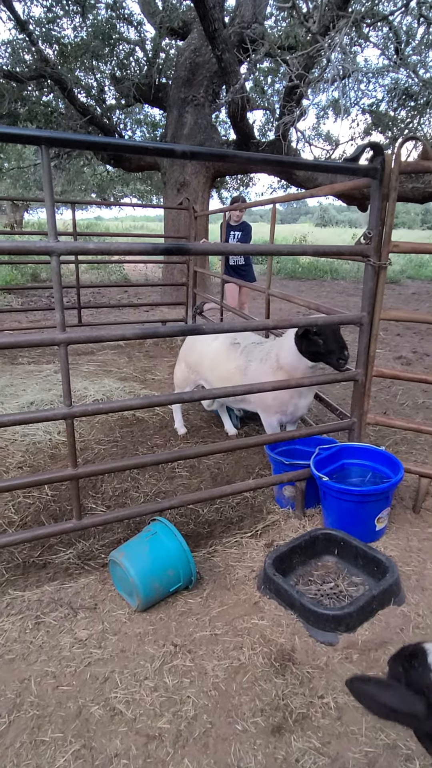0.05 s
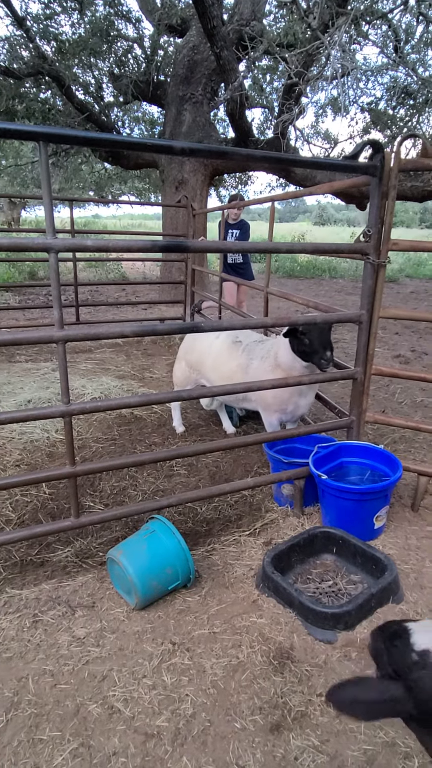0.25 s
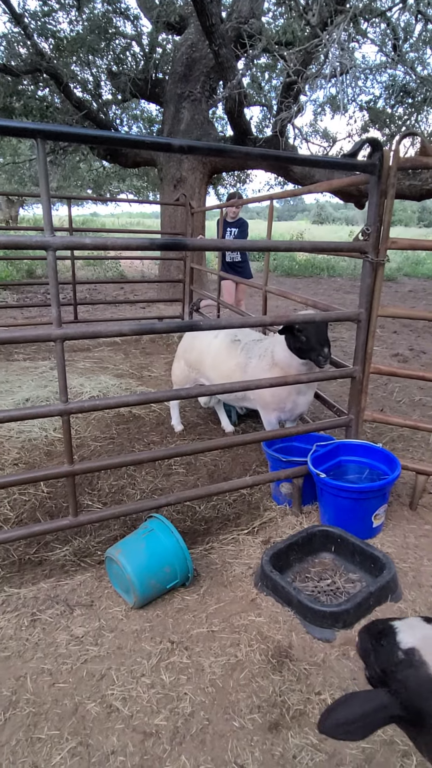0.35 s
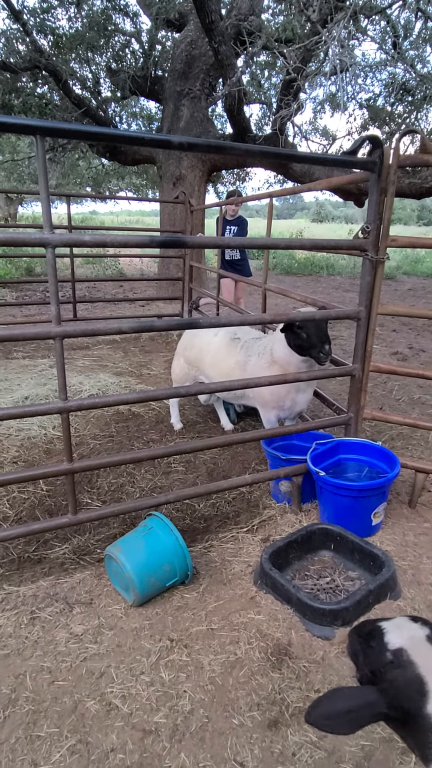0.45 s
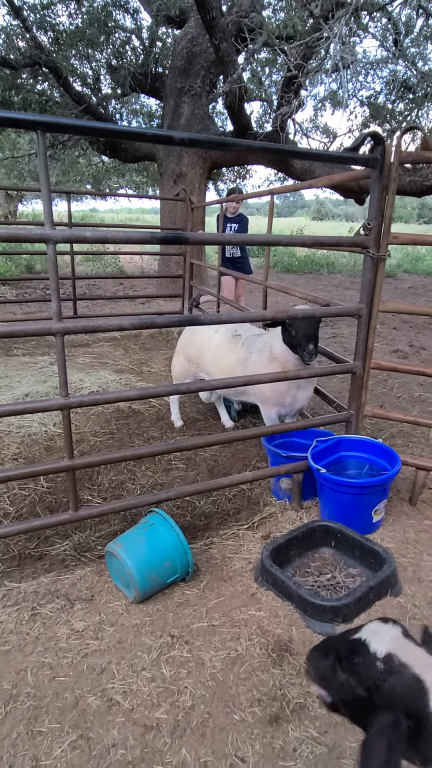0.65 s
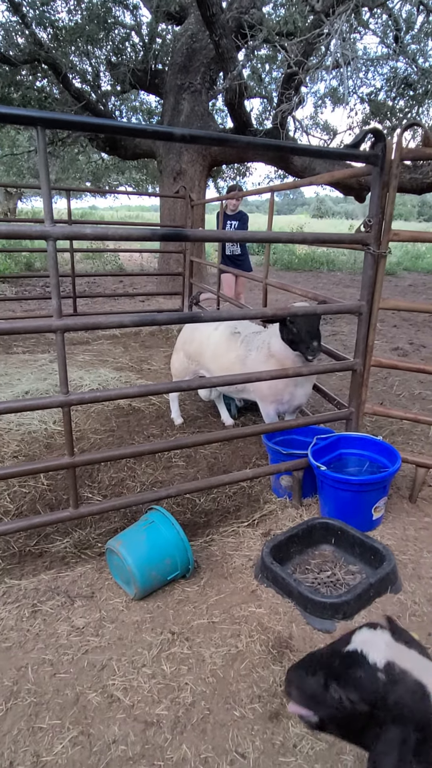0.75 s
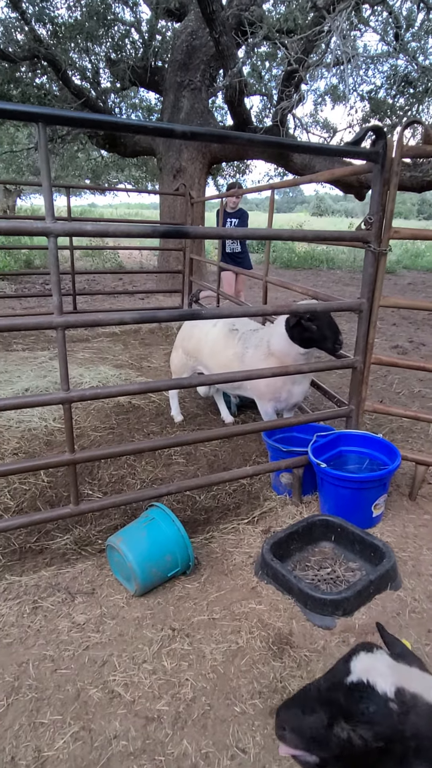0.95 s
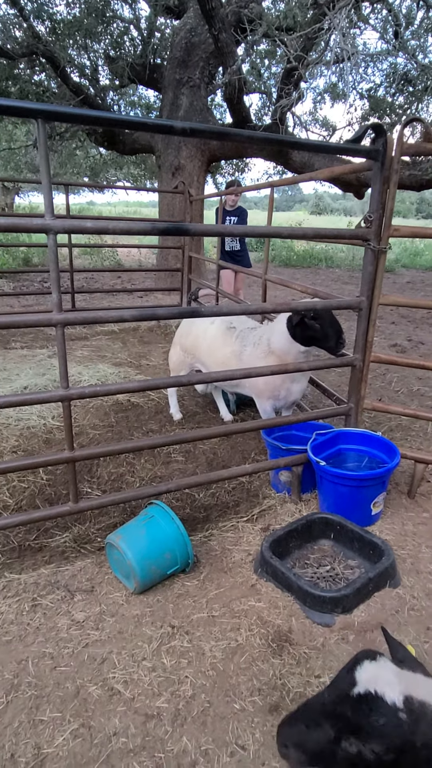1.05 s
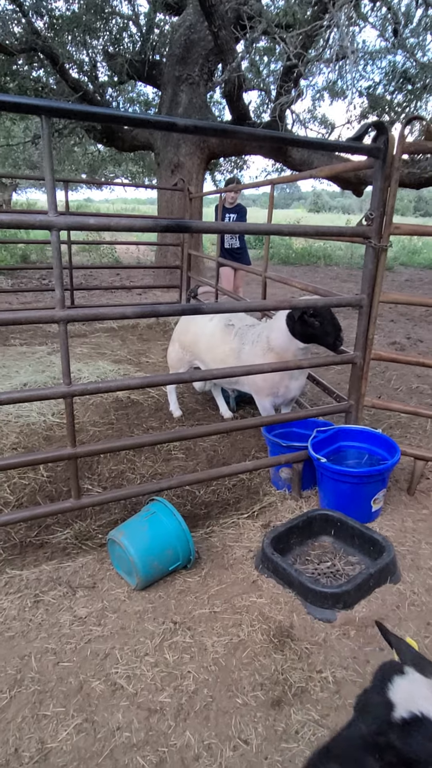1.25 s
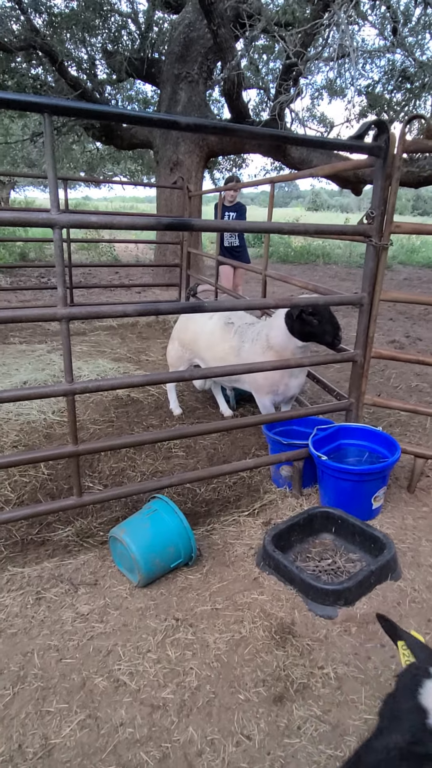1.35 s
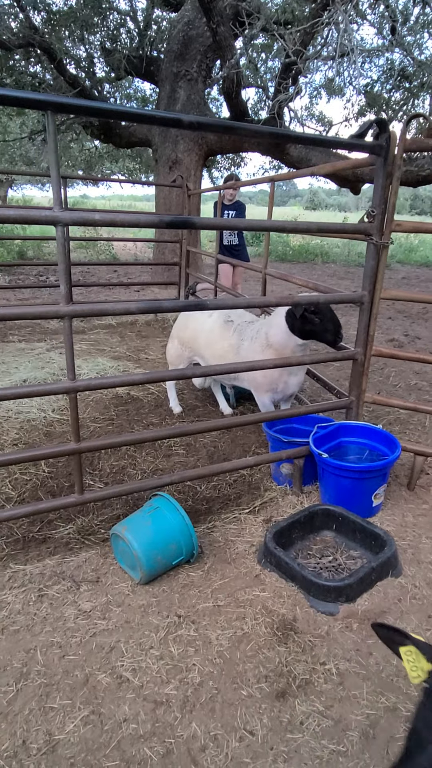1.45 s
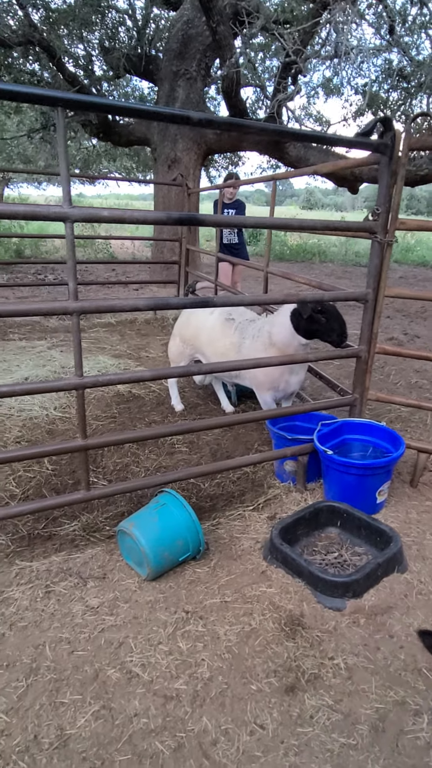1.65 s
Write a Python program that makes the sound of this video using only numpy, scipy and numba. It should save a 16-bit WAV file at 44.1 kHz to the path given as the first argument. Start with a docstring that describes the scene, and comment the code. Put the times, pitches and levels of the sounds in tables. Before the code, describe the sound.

A sheep gives one hoarse, quavering bleat in an outdoor pen.

```python
"""Ram bleating in an open pen

A phone stands a few metres from a ram, which draws air and gives one hoarse, quavering bleat.
Slack throat tissue flaps, the vocal folds buzz in and out of pitch and air rasps through the mouth.
Close to the microphone straw ticks and, after the bleat, something creaks, over a faint hum and hiss."""
import sys
import numpy as np
from scipy import signal
from scipy.fft import rfft, irfft
from scipy.io import wavfile
from scipy.ndimage import uniform_filter1d
from numba import njit

SR = 44100
rng = np.random.default_rng(int(sys.argv[2]) if len(sys.argv) > 2 else 0)


def unload_wav(signal):
    """Save mono or channel-first audio to the path in sys.argv[1] as 16-bit WAV at rate SR, clipped to [-1, 1]."""
    wavfile.write(
        sys.argv[1],
        SR,
        np.round(np.clip(np.atleast_2d(signal).T, -1, 1) * 32767).astype(np.int16),
    )


N = 74970

# the bleat's loudness, a quaver that deepens into separate throbs: time_s, level_db
EFFORT = [(0.17, -51.5), (0.208, -28.5), (0.216, -18), (0.24, -22.5), (0.248, -13.5), (0.288, -23),
          (0.296, -13.5), (0.318, -10.5), (0.348, -15.5), (0.358, -13), (0.378, -16), (0.406, -11.5),
          (0.416, -26), (0.424, -9), (0.456, -16.5), (0.462, -12), (0.508, -17), (0.522, -10), (0.574, -18),
          (0.596, -10.5), (0.652, -21), (0.67, -11), (0.68, -14), (0.71, -13), (0.724, -23.5),
          (0.764, -12.5), (0.796, -14), (0.804, -26.5), (0.822, -29), (0.834, -16), (0.88, -16.5),
          (0.908, -36.5), (0.926, -14.5), (0.968, -13), (0.99, -37), (1.01, -13), (1.06, -68.5)]
# gain on each band of the voice: time_s, middle_db, treble_db, low_db, hiss_db
BAND_GAINS = [(.19, 9, 7.5, 15.5, 1), (.225, -3, 8.5, -4.5, 9), (.255, 10, 7.5, -3.5, 3),
              (.288, 2.5, 9, 2.5, 3.5), (.315, 0, -1, -8, -2.5), (.345, 2, 2.5, 0.5, -1),
              (.40, 3.5, -2, 1, 2.5), (.45, 1, -4, -1, -3.5), (.525, 0, -4, -1, 1),
              (.59, 5, -2.5, -1, -3.5), (.70, 0.5, -4.5, 0, 1.5), (.78, 2.5, -7.5, -3, -3),
              (.85, 2.5, -1.5, 3, -0.5), (.94, 2.5, -9, 1, -2), (1.005, 2.5, 5.5, -3.5, -3.5),
              (1.035, 1, 7, 17, 8)]
# resonances of the moving mouth: time_s, first_hz, second_hz
MOUTH = [(.2, 803, 1960), (.25, 886, 1810), (.36, 856, 1780), (.45, 903, 2000), (.55, 888, 2065),
         (.70, 923, 2110), (.79, 857.2, 2126), (.95, 920, 2017), (1.04, 745, 1790)]
# vocal folds: time_s, pitch_hz, buzz_share (0-1)
FOLDS = [(.2, 205.3, 0.22), (.33, 211.9, 0.06), (.44, 218.7, 0.08), (.53, 218.9, 0.08), (.64, 221.8, 0.34),
         (.675, 234.4, 0.8), (.72, 231.3, 0.82), (.78, 228, 0.61), (.83, 219.3, 0.2), (.95, 206.5, .5),
         (1.04, 193.1, 0.34)]
# air against the flaps, a crisp rattle first, then denser: time_s, air_db
HOARSENESS = [(.22, 0), (.3, -6), (.44, -5), (.52, 4), (1.0, 3)]
# steady bands of the voice: centre_hz, width_hz, gain_db
LOW_BANDS = [(95, 70, -26), (225, 110, -22), (395, 130, -13), (730, 70, -17)]
# the two near 1100 and 1350 Hz bring out the buzz's fifth and sixth harmonics
MIDDLE_BANDS = [(1082, 190, -9), (1336, 120, -4.5), (1922, 310, -17), (2480, 300, -32)]
TREBLE_BANDS = [(2714, 460, -17.5), (3250, 343, -15.5), (4074, 300, -25)]
HISS_BANDS = [(5010, 2400, -31), (5340, 2000, -29), (9020, 2800, -35), (12840, 4000, -32.5)]
# harsh catches in the throat: time_s, level_db, centre_hz
CATCHES = [(0.2931, -12.5, 3740), (0.354, -12.5, 3000), (0.402, -9.5, 3000), (0.418, -15.5, 2675),
           (0.472, -18.5, 3770), (0.588, -18.5, 1970), (1.008, -19.5, 2740)]
# the short draw of air: time_s, level_db
INTAKE = [(.065, -68), (.10, -38.5), (.14, -37.5), (.165, -73)]
# single slips of the creak: start_s, strength_db
SLIPS = [(1.339, -39.5), (1.362, -31.5), (1.375, -32), (1.391, -29.5), (1.409, -25.5), (1.434, -23),
         (1.4369, -25.5), (1.496, -30), (1.498, -22.5)]
# the creak's quick chatter: time_s, level_db
CHATTER = [(1.440, -41.5), (1.457, -33.5), (1.483, -32.5), (1.495, -54), (1.52, -50.5)]
# ticks in the straw: time_s, level_db, centre_hz
STRAW_TICKS = [(.125, -48, 10900), (1.223, -58, 11500), (1.3055, -36.5, 3080), (1.627, -50.5, 2070),
               (1.680, -48, 1900)]
# partials of the hum: pitch_hz, level_db
HUM_PARTIALS = [(60.3, -57.5), (120.6, -62.5), (181, -66)]
# tone of the breath, slips, chatter and background noise: frequency_hz, gain_db
INTAKE_COLOUR = [(120, -33.5), (200, -5.5), (422, -2), (772, -29.5), (859, -23), (1440, 1.5), (2200, -15),
                 (3150, -7), (6290, -23), (7380, -37), (14000, -34)]
SLIP_COLOUR = [(120, -61), (200, -26.5), (360, -8), (537, -19.5), (1030, -2.5), (1870, -11.5),
               (3990, -30.5), (4590, -44), (8000, -52), (10400, -66), (17600, -120)]
CHATTER_COLOUR = [(120, -81), (200, -44.5), (365, 2), (505, -17), (720, -7), (802, -9), (1090, -2),
                  (2150, -23.5), (2630, -27), (8000, -64), (10400, -88.5), (17600, -120)]
FLOOR_COLOUR = [(20, -24), (50, -10), (75, -6), (130, -10.5), (190, -12.5), (300, -16.5), (700, -23.5),
                (1700, -30), (4700, -35), (7300, -45.5), (8600, -36), (9550, -23), (10600, -40.5),
                (15500, -41)]
# the ram's balance at the phone: frequency_hz, left_minus_right_db
RAM_BALANCE = [(100, 0.5), (380, -3), (800, -0.5), (1290, -3), (2400, -1.5), (4400, -9), (8100, 9.5),
               (15000, 2)]
# left microphone's delay behind the right, for the ram and for close sounds: frequency_hz, lag_s
RAM_LAG = [(870, 0.00024), (1400, 0.00031), (4000, 0.000348)]
NEAR_LAG = [(100, -.00014), (10000, -.00014)]

FLAP_HZ, CHATTER_HZ = 97.75, 648
AIR_LEAK, AIR_DECAY_CYCLES, RASP_DB = 0.25, 0.53, 1.5  # the leak is the flow left when the flaps shut
HISS_DB, HISS_FOLLOW = 10, 0.77  # the hiss swings less than the voice
HISS_SPREAD = 0.35  # share that differs between the microphones
FLOOR_DB = -55


def ram():
    """A few metres off, to the right: breath, bleat and throat catches, with the pen's reflections."""
    intake = unit(colour(rng.standard_normal(N), INTAKE_COLOUR)) * envelope(INTAKE)
    catches = sum(undb(db) * burst(time_s, rise_s=0.001, decay_s=0.0018, hz=hz, width_hz=1300)
                  for time_s, db, hz in CATCHES)
    direct = microphones(intake + bleat() + catches, RAM_LAG)
    early = undb(-4) * reflections(direct, t60_s=0.07, low_hz=1660)
    pen = undb(-18.5) * reflections(direct, t60_s=0.21, low_hz=703)
    lean_db = spectrum(RAM_BALANCE) / 2
    return irfft(rfft(direct + early + pen) * undb([lean_db, -lean_db]), N)


def bleat():
    """Flapping tissue, buzzing folds and pulsed air ring the throat; effort sets the level."""
    flaps, flap_phase = pulse_train(FLAP_HZ, jitter=0.1, scatter_db=4.5)
    buzz, _ = pulse_train(curve(FOLDS), jitter=0.012, scatter_db=6.5)
    rattle = unit(flaps + undb(curve(HOARSENESS)) * pulsed_air(flap_phase))
    buzz_share = curve(FOLDS, column=2)
    source = np.sqrt(buzz_share) * buzz + np.sqrt(1 - buzz_share) * rattle
    voice = voice_tone(source, flap_phase)
    running_power = uniform_filter1d(uniform_filter1d(voice ** 2, size=900), size=500)
    even_voice = voice / np.sqrt(running_power + 1e-12)
    effort = envelope(EFFORT)
    return even_voice * effort + breath_hiss(flap_phase) * effort ** HISS_FOLLOW


def voice_tone(source, flap_phase):
    """Two moving mouth resonances ring beside the voice's steady bands; air roughens the treble."""
    first = undb(3.5) * resonate(source, curve(MOUTH), width_hz=179)
    second = undb(-13.5) * resonate(source, curve(MOUTH, column=2), width_hz=397)
    middle = second + bank(source, MIDDLE_BANDS)
    rasp = undb(RASP_DB) * pulsed_air(flap_phase)
    treble = bank(unit(source + rasp), TREBLE_BANDS)
    low = bank(source, LOW_BANDS)
    return first + sum(undb(curve(BAND_GAINS, column)) * band
                       for column, band in enumerate([middle, treble, low], start=1))


def pulsed_air(flap_phase):
    """Air puffs through at each flap, then falls back towards a steady leak."""
    return unit(rng.standard_normal(N) * (AIR_LEAK + np.exp(-flap_phase / AIR_DECAY_CYCLES)))


def breath_hiss(flap_phase):
    """Pulsed air in the highest bands, partly different at each microphone."""
    shared, left, right = (bank(pulsed_air(flap_phase), HISS_BANDS) for _ in range(3))
    hiss = np.sqrt(1 - HISS_SPREAD) * shared + np.sqrt(HISS_SPREAD) * np.array([left, right])
    return undb(HISS_DB + curve(BAND_GAINS, column=4)) * hiss


def creak():
    """Close by, a little left, a dull body sticks and slips: single slips, then a quick chatter."""
    slips = np.zeros(N)
    for start_s, db in SLIPS:
        slips[int(start_s * SR)] += undb(db)
    slips = colour(slips, SLIP_COLOUR)
    slips *= undb(max(db for _, db in SLIPS)) / np.abs(slips).max()
    pulses, _ = pulse_train(CHATTER_HZ, jitter=0.2, scatter_db=4)
    chatter = unit(colour(pulses - pulses.mean(), CHATTER_COLOUR)) * envelope(CHATTER)
    direct = microphones(slips + chatter, NEAR_LAG)
    return direct + undb(-8) * reflections(direct, t60_s=0.063, low_hz=394)


def straw():
    """Dry straw ticks near the phone, each a tiny burst of noise."""
    ticks = sum(undb(db) * burst(time_s, rise_s=0.00026, decay_s=0.002, hz=hz, width_hz=hz / 3)
                for time_s, db, hz in STRAW_TICKS)
    direct = microphones(ticks, NEAR_LAG)
    return direct + undb(-9) * reflections(direct, t60_s=0.026, low_hz=806)


def background():
    """The pen's low hum and faint hiss, wide in the treble and nearly centred in the bass."""
    t = np.arange(N) / SR
    hum = sum(np.sqrt(2) * undb(db) * np.sin(2 * np.pi * (hz * t + rng.random()))
              for hz, db in HUM_PARTIALS)
    mid, side = colour(rng.standard_normal((2, N)), FLOOR_COLOUR)
    side = colour(side, [(150, -13.5), (500, -11), (1500, 0)])
    return hum + undb(FLOOR_DB) * unit(np.array([mid + side, mid - side]))


def microphones(x, lag):
    """Sound reaches the phone's two microphones at slightly different times."""
    half_delay = np.exp(-1j * np.pi * np.fft.rfftfreq(N, 1 / SR) * spectrum(lag))
    return irfft(rfft(x) * np.array([half_delay, half_delay.conj()]), N)


def reflections(x, t60_s, low_hz):
    """Dense reflections, different at each microphone, thin in the bass."""
    t = np.arange(N // 2) / SR
    tails = rng.standard_normal((2, len(t))) * np.exp(-np.log(1000) * t / t60_s) * (t > .003)
    tails /= np.sqrt(np.sum(tails ** 2) / 2)
    low_cut = signal.butter(1, low_hz, "high", fs=SR, output="sos")
    return signal.fftconvolve(x, signal.sosfilt(low_cut, tails), axes=1)[:, :N]


def pulse_train(hz, jitter, scatter_db):
    """Uneven pulses at rms 1, and their phase in cycles."""
    rate_draw, size_draw = rng.standard_normal((N // 10, 2)).T
    pulses, phase = cycles(hz * np.ones(N), np.exp(jitter * rate_draw), undb(scatter_db * size_draw))
    return unit(pulses), phase


@njit
def cycles(hz, rate, size):
    """A pulse at each wrap of the phase; every cycle has its own rate and size."""
    pulses, phases, phase, cycle = np.zeros(len(hz) + 1), np.empty(len(hz)), 0., 0
    for i in range(len(hz)):
        step = hz[i] * rate[cycle] / SR
        phase += step
        if phase >= 1:
            phase, cycle = phase - 1, cycle + 1
            share = min(phase / step, 1.)  # the pulse falls between two samples
            pulses[i] += size[cycle] * share
            pulses[i + 1] += size[cycle] * (1 - share)
        phases[i] = phase
    return pulses[:-1], phases


def burst(peak_s, rise_s, decay_s, hz, width_hz):
    """A puff of noise in one band that swells and dies away."""
    age = np.arange(N) / SR - peak_s
    swell = np.exp(-np.abs(age) / np.where(age < 0, rise_s, decay_s))
    return unit(resonate(rng.standard_normal(N), hz, width_hz)) * swell


def bank(x, bands):
    """Several steady bands side by side."""
    return sum(undb(db) * resonate(x, hz, width_hz) for hz, width_hz, db in bands)


def resonate(x, hz, width_hz):
    """A band-pass applied twice, for steep skirts."""
    hz, width_hz = hz * np.ones(N), float(width_hz)
    return band_pass(band_pass(x, hz, width_hz), hz, width_hz)


@njit
def band_pass(x, hz, width_hz):
    """State-variable filter with a moving centre."""
    y, band_state, low_state = np.empty(len(x)), 0., 0.
    for i in range(len(x)):
        tuning, damping = np.tan(np.pi * hz[i] / SR), width_hz / hz[i]
        band = (band_state + tuning * (x[i] + 1e-18 - low_state)) / (1 + tuning * (tuning + damping))
        band_state = 2 * band - band_state
        low_state += 2 * tuning * band
        y[i] = damping * band
    return y


def colour(x, points):
    """Causal filter through (frequency_hz, gain_db) points."""
    cepstrum = irfft(np.log(undb(spectrum(points))), N)
    cepstrum[1:N // 2] *= 2
    cepstrum[N // 2 + 1:] = 0
    return irfft(rfft(x) * np.exp(rfft(cepstrum)), N)


def spectrum(points):
    """(frequency_hz, value) points read at every frequency bin."""
    hz, values = np.array(points).T
    return np.interp(np.log(np.fft.rfftfreq(N, 1 / SR) + 1), np.log(hz), values)


def envelope(table):
    """Gain from (time_s, level_db) points, silent outside them."""
    t = np.arange(N) / SR
    return undb(curve(table)) * (t > table[0][0]) * (t < table[-1][0])


def curve(table, column=1):
    """One column of a table, joined by straight lines in time."""
    rows = np.array(table)
    return np.interp(np.arange(N) / SR, rows[:, 0], rows[:, column])


def undb(db):
    """Decibels to gain."""
    return 10 ** (np.asarray(db) / 20)


def unit(x):
    """Scale to rms 1."""
    return x / np.sqrt(np.mean(x ** 2))


def scene():
    """The pen in stereo, from where the phone stands."""
    return ram() + creak() + straw() + background()


def record(dry):
    """The phone holds peaks to full scale and cuts the top."""
    top_cut = signal.ellip(10, .2, 80, 15850, fs=SR, output="sos")
    return signal.sosfilt(top_cut, np.clip(dry, -1, 1))


dry = scene()
out = record(dry)
unload_wav(out)
```